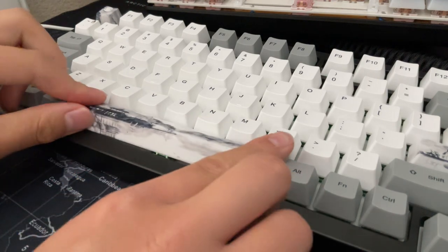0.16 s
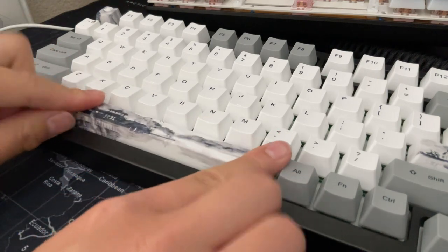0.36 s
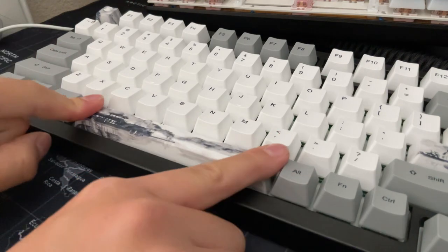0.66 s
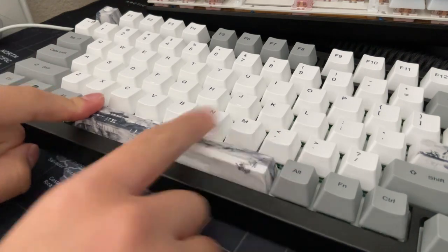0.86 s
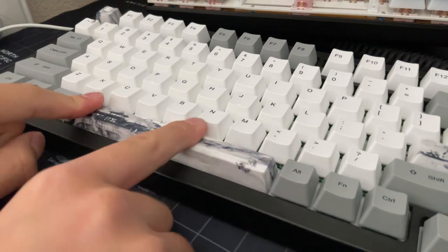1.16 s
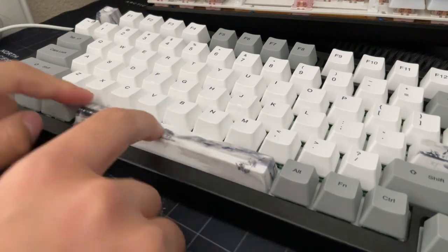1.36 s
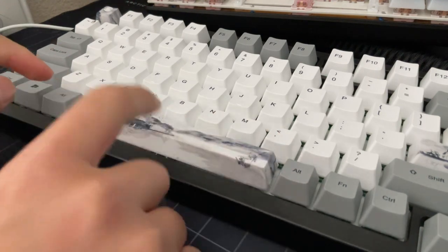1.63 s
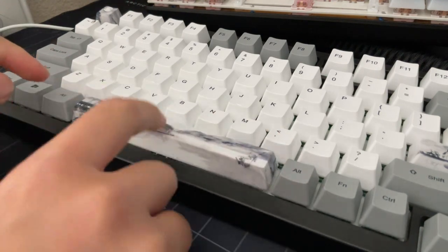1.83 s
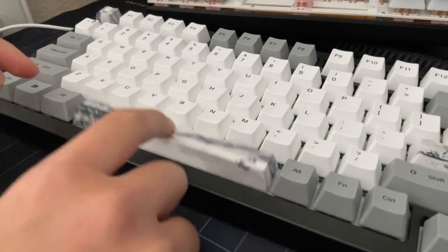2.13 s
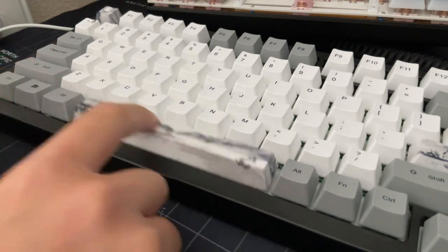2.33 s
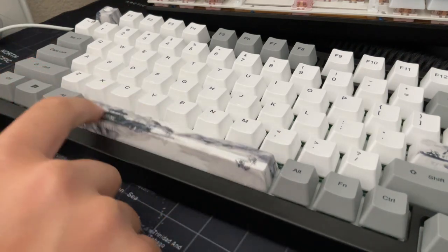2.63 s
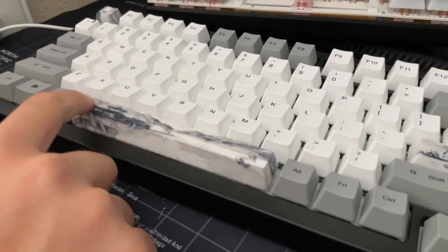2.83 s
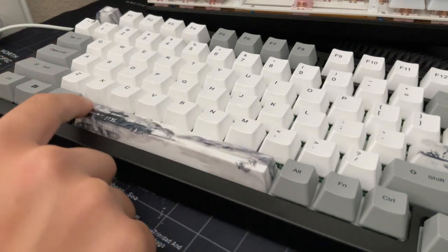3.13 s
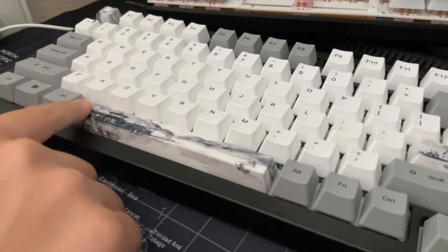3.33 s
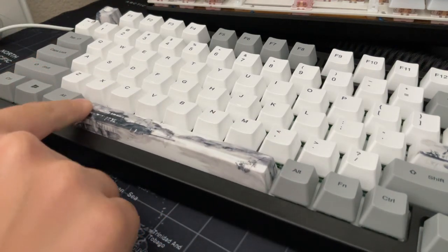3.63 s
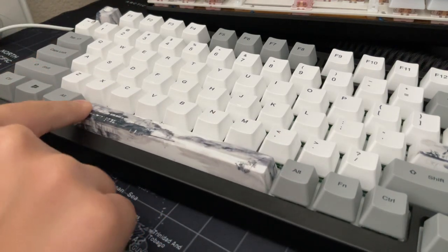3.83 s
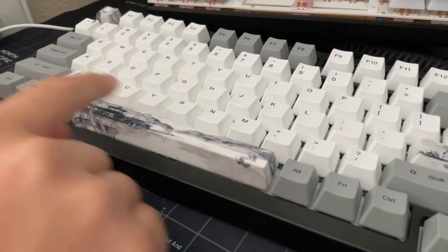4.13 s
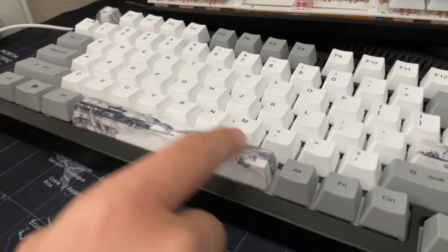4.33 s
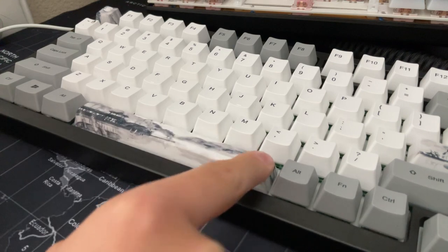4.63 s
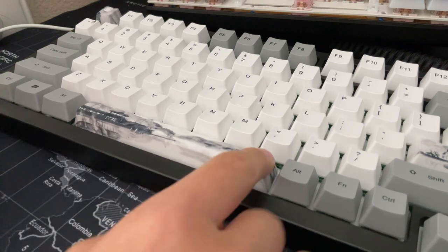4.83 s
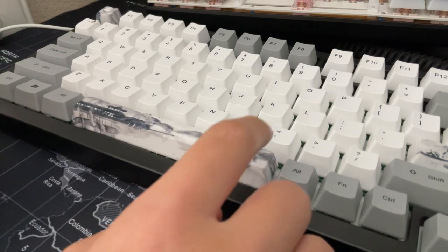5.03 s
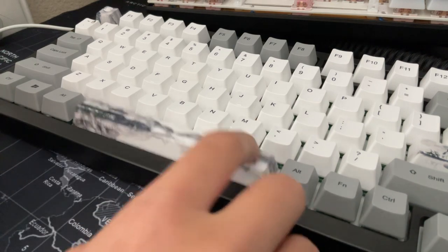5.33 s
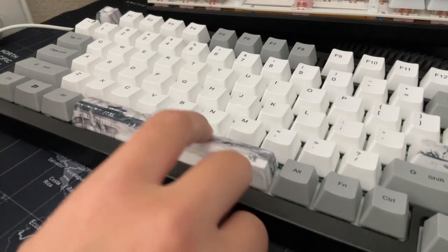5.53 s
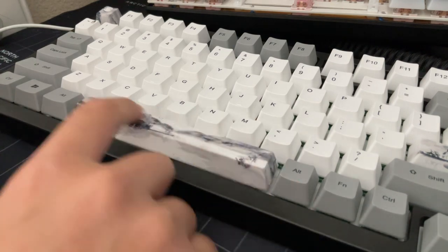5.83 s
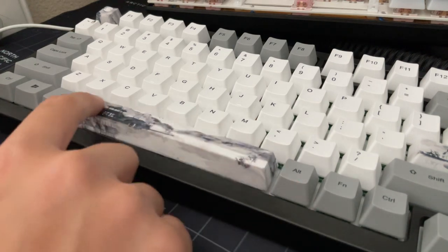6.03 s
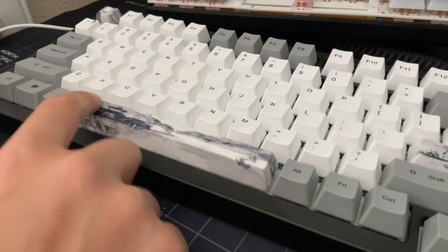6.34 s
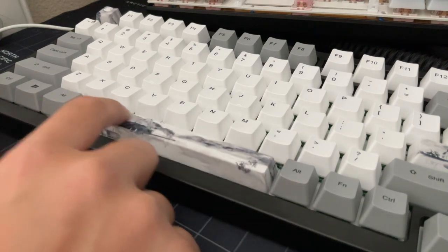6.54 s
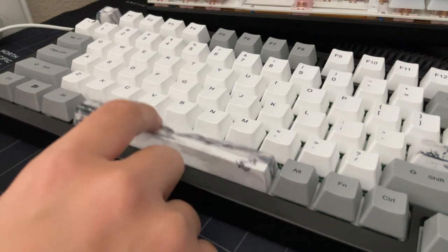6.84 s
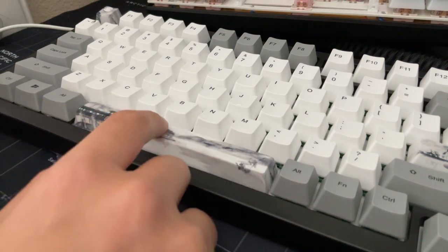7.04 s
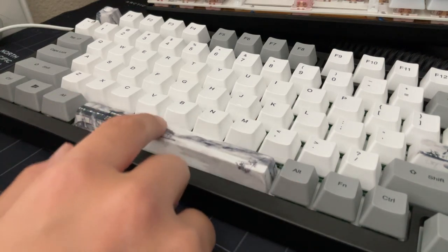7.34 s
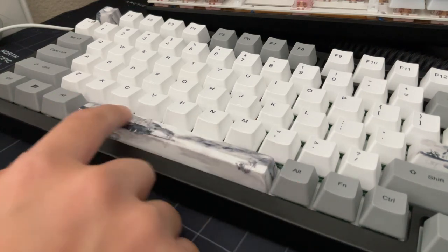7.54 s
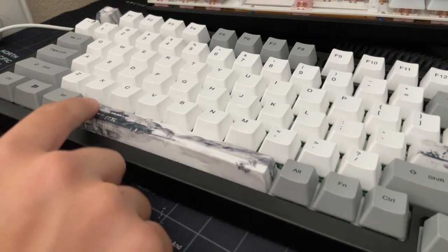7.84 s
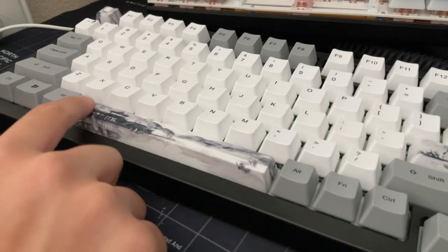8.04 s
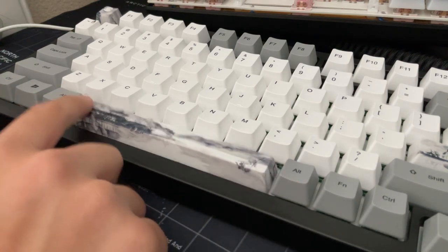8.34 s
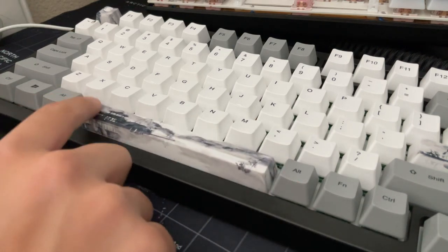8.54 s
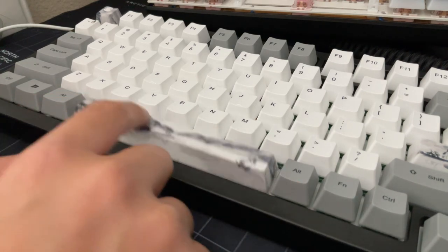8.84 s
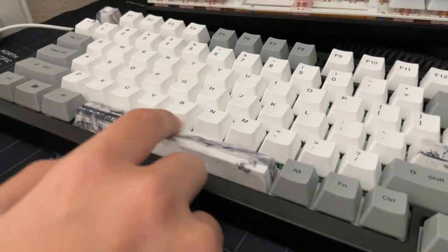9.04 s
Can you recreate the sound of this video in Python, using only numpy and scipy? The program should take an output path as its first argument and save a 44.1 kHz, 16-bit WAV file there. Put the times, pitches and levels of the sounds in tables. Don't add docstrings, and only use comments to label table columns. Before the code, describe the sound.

Mechanical keyboard spacebar heard close on a phone microphone with little bass. Soft skin rubbing, two nail knocks and muffled case bumps lead into a brisk run of sharp, hollow clacks with a low desk thud beneath. The finger rests for about a second, slides faintly, presses a few separate times, then taps continuously at an even pace, strokes varying in force, with small release clicks and loose rattling ticks between.

```python
import sys
import numpy as np
from scipy import signal
from scipy.fft import rfft, irfft
from scipy.io import wavfile
from scipy.ndimage import uniform_filter1d, map_coordinates

SR = 44100
rng = np.random.default_rng(int(sys.argv[2]) if len(sys.argv) > 2 else 0)


def waveform_to_disk(signal):
    frames = np.transpose(np.atleast_2d(signal))
    scaled = np.clip(frames, -1, 1) * 32767
    samples = np.round(scaled).astype(np.int16)
    wavfile.write(sys.argv[1], SR, samples)


def volts_from_decibels(level):
    exponent = np.asarray(level, float) / 20
    return 10 ** exponent


N = 404838
RING = np.arange(round(0.3 * SR)) / SR


def unit(x):
    return x / np.sqrt(np.mean(x ** 2) + 1e-20)


def along(points, hz):
    f, v = np.transpose(points)
    return np.interp(np.log(hz + 1), np.log(f + 1), v)


def decay(t60, rise):
    return volts_from_decibels(-60 * RING / t60) * (1 - np.exp(-RING / rise))


def burst(spectrum, envelope):
    gain = volts_from_decibels(along(spectrum, np.fft.rfftfreq(len(RING), 1 / SR)))
    noise = irfft(rfft(rng.standard_normal(len(RING))) * gain, len(RING))
    out = envelope * noise
    return out / np.abs(out).max()


def hiss(spectrum, patchy_db):
    hz, _, z = signal.stft(rng.standard_normal(N), SR, nperseg=512)
    field = uniform_filter1d(rng.standard_normal(z.shape), size=8, axis=0)
    field = uniform_filter1d(field, size=5, axis=1)
    gain = volts_from_decibels(along(spectrum, hz)[:, None] + patchy_db * unit(field))
    return unit(signal.istft(z * gain, SR, nperseg=512)[1][:N])


def ring(modes, attack, vary_db=2.3):
    hz, db, t60 = np.transpose(modes)[:, :, None]
    detune = 0.009 * rng.standard_normal((len(modes), 1))
    vary = vary_db * rng.standard_normal((len(modes), 1))
    wave = np.sin(2 * np.pi * hz * (1 + detune) * RING)
    rise = (1 - np.exp(-RING / attack * (hz / hz[0]) ** 2)) ** 2
    out = np.sum(volts_from_decibels(db + vary - 60 * RING / t60) * rise * wave, axis=0)
    return out / np.abs(out).max()


# f/Hz, t60/s
SCATTER_T60 = [(150, 0.43), (600, 0.046), (1600, 0.22), (4000, 0.15), (10000, 0.14)]


def answer(x, db):
    hz, t, z = signal.stft(rng.standard_normal(len(RING)), SR, nperseg=128)
    damping = volts_from_decibels(-60 * t / along(SCATTER_T60, hz)[:, None])
    tail = signal.istft(z * damping, SR, nperseg=128)[1][:len(RING)]
    tail = tail * (1 - np.exp(-(RING / 0.008) ** 2))
    instant = x * (0.15 + np.exp(-RING / 0.002))
    instant = instant * np.linalg.norm(x) / np.linalg.norm(instant)
    return x + volts_from_decibels(db) * signal.fftconvolve(instant, tail / np.linalg.norm(tail))[:len(RING)]


def rattle(envelope):
    late = rng.uniform(0.001, 0.005, size=2)
    weaker_db = rng.uniform(-13, -6, size=2)
    out = envelope
    for s, db in zip(late, weaker_db):
        out = out + volts_from_decibels(db) * np.roll(envelope, round(s * SR))
    return out


def swells(rows):
    middle, half, *levels = np.transpose(rows)[:, :, None]
    t = np.arange(N) / SR
    coarse = t[::32]
    shape = volts_from_decibels(-20 * np.abs((coarse - middle) / half) ** 2.6)
    return [np.interp(t, coarse, np.sqrt(volts_from_decibels(2 * db[:, 0]) @ shape)) for db in levels]


def add(track, s, sound):
    track[max(round(s * SR), 0):][:len(sound)] += sound


# f/Hz, density/dB per Hz
ROOM_SPECTRUM = [(18, -35.5), (30, -15), (81, 13), (121, -3), (157, -8.5), (295, 4.5), (415, -2),
                 (684, 5.5), (913, -16.5), (1460, -12.5), (4420, -21), (15500, -28.5), (15900, -58)]


def room():
    return volts_from_decibels(-72) * hiss(ROOM_SPECTRUM, patchy_db=1)


# middle t/s, half length/s, rumble level/dB
PALM_SHIFTS = [(.236, 0.04, -71), (.37, 0.029, -64), (.5, 0.15, -47), (.73, 0.073, -65.5),
               (.835, .035, -53.5), (.97, 0.093, -57.5), (1.22, 0.082, -56), (1.34, 0.018, -57),
               (3.93, 0.092, -72.5), (9.1, 0.089, -57), (4.7, 0.14, -65.5), (4.85, 0.099, -63)]
# f/Hz, density/dB per Hz
MAT_SPECTRUM = [(40, -11), (70, 4), (200, -2.5), (500, -19.5), (1000, -16.5), (1500, -34.5)]


def palms():
    return volts_from_decibels(-8) * swells(PALM_SHIFTS)[0] * hiss(MAT_SPECTRUM, patchy_db=3)


# t/s, peak level/dB, desk level against it/dB
BUMPS = [
    (0.02, -42, -13),
    (0.388, -23, -19.5),
    (0.748, -50, -11.5),
    (0.914, -40, -10),
    (1.174, -53.5, -32),
    (1.36, -49, -1),
    (4.104, -44, -16),
    (4.637, -54, -6),
]
# f/Hz, level/dB, t60/s
HEEL_MODES = [(150, -1, 0.079), (199.7, 5, 0.047), (305, -1.5, 0.026), (400, -12.5, .025)]
# f/Hz, level/dB, t60/s
DESK_MODES = [(69.7, 0.51, 0.19), (123, 2, 0.082), (86.4, -1.3, 0.14)]


def hands():
    track = np.zeros(N + SR)
    damped = [(hz, db, 0.69 * t60) for hz, db, t60 in DESK_MODES]
    for s, db, desk_db in BUMPS:
        thud = ring(HEEL_MODES, attack=0.004) + volts_from_decibels(desk_db + 10.5) * ring(damped, attack=0.012)
        add(track, s - 0.003, volts_from_decibels(db) * thud)
    return track[:N]


# t/s, force level/dB, then against it
# lower cap level/dB, stem level/dB, extra case level/dB
PRESSES = [(1.3565, -6.5, -7, -15.5, 3.5), (1.618, -18, -5, -10, -2.5), (1.7617, -3.5, -13, -19, 1.5),
           (1.923, -6, -8, -15, 0), (2.0963, -7, -8, -15, 1), (2.2668, -17.5, -1, -12, 1.5),
           (2.448, -17.5, -1, -11.5, 2.5), (2.6205, -48.5, 14, -9, -2), (2.7467, -19.5, 0, -13, 1),
           (2.934, -21.5, -1.5, -17.5, -1.5), (3.096, -13.5, -3.5, -14.5, 0.5),
           (4.1021, -14.5, -4.5, -2, 4.5), (4.4838, -15.5, -4, -10, -1.5), (4.97, -50, 12, -2.5, -3.5)]
RUN = [(5.1354, -7.5, -6.5, -16, 0.0063), (5.3049, -15.5, -3.5, -12, 0), (5.4619, -11, -5, -12, 0),
       (5.645, -18.5, -2.5, -12.5, 0), (5.7963, -22.5, -3.5, -10.5, 0), (5.956, -19, -1.5, -10.5, 0),
       (6.1083, -33, 7, -10, 0), (6.2415, -25, 3.5, -10, 0), (6.3927, -19.5, -1.5, -17, 0.0047),
       (6.5666, -45.5, 12.5, -6.5, 0), (6.7171, -13.5, -6, -15, 0), (6.8833, -28.5, 2.5, -12, 0),
       (7.027, -11, -5, -14.5, 0), (7.201, -17.5, -3, -18, 0), (7.365, -16.5, -3, -15.5, 0),
       (7.524, -26.5, 2.5, -11, 0.0043), (7.7842, -36.5, 5.5, -5, 0.0094), (7.8612, -14, -3.5, -19.5, 0),
       (8.0345, -13, -4.5, -16, 0), (8.2081, -12, -5, -19, 0), (8.3699, -19, 0, -17, 0.0079),
       (8.543, -34, 6, -9.5, 0), (8.7254, -17.5, -3.5, -18, 0.013), (8.8845, -18, -1.5, -12.5, 0)]
# t/s, force level/dB, then against it lower cap level/dB, stem level/dB
RELEASES = [(1.8339, -29.5, 4.5, -2.5), (2.0086, -27.5, 2, -4.5), (2.174, -31, 6, -1.5),
            (2.37, -31.5, 4.5, -3), (2.6851, -42, 11, -3), (2.863, -37.5, 9, -1), (3.0107, -73, 25, 12),
            (4.2688, -30, 2.5, -4.5), (5.228, -40, 11, 4), (5.3776, -28.5, 4, -2.5), (5.5507, -33, 3, -3),
            (5.7115, -29.5, 2.7, -2.5), (5.8635, -34, 6.5, 1), (6.0361, -44.5, 11.5, 1.5),
            (6.6233, -27.5, -2.5, -6.5), (6.7953, -35.5, 5, -0.5), (6.9466, -31, 9.5, -1.5),
            (7.1299, -48.5, 10.5, 0), (7.2813, -37, 6.5, 0.5), (7.4528, -52, 14.5, 4.5),
            (7.6309, -40, 8, -2), (7.949, -36, 8, 0), (8.1165, -36.5, 8, -1.5), (8.2846, -37, 8.5, -1),
            (8.4446, -32, 5, -3.5), (8.622, -46.5, 14.5, 4), (8.7977, -29, 1, -5.5),
            (8.9739, -37.5, 4, -1.5), (9.1348, -35, 5, -3)]


def roll(db, grows, t60):
    power = np.zeros(N)
    for s, force_db, *_ in PRESSES + RUN + RELEASES:
        power[round(s * SR)] = volts_from_decibels(2 * (db + grows * force_db))
    return np.sqrt(signal.lfilter([1], [1, -volts_from_decibels(-120 / SR / t60)], power))


# middle t/s, half length/s,
# hiss level/dB, level of the drag through the cap/dB
SLIDES = [(0.03, 0.065, -58.5, -64.5), (0.12, 0.039, -63, -68.5), (0.232, 0.043, -58.5, -59),
          (.241, 0.008, -57, -51.5), (.33, 0.049, -82, -79), (0.38, 0.12, -62.5, -65.5),
          (0.58, .11, -59, -65.5), (0.75, 0.036, -59.5, -67.5), (0.83, 0.036, -57.5, -69),
          (0.91, 0.069, -61, -70.5), (1.04, 0.03, -68.5, -84), (1.23, 0.079, -59.5, -71),
          (1.34, 0.015, -70, -66), (3.375, 0.054, -60, -72), (3.87, 0.038, -79.5, -81),
          (4.055, 0.013, -68, -75), (4.094, 0.016, -53.5, -60.5), (4.24, 0.067, -53, -62),
          (4.36, 0.097, -57, -67.5), (4.57, 0.095, -64.5, -73.5), (3.937, 0.012, -71, -94.5),
          (4.9, 0.072, -69.5, -77.5), (5.0, .04, -100, -87), (5.12, 0.0053, -62, -55),
          (6.49, 0.087, -72, -90)]
# middle t/s, half length/s, hiss level/dB, dry hiss level/dB
RUBS = [(1.42, 0.071, -68, -96), (1.67, 0.092, -72, -86), (1.96, 0.091, -60.5, -76), (2.2, 0.3, -69, -84),
        (2.49, 0.062, -64, -77), (2.8, 0.21, -70.5, -90), (3.14, 0.054, -65, -90), (5.2, 0.075, -64.5, -84),
        (5.34, 0.092, -65, -79), (5.5, 0.1, -65, -78), (5.72, 0.14, -66, -80), (5.9, .1, -63.5, -67),
        (6.07, 0.13, -67, -76), (6.28, 0.06, -68, -87), (6.6, 0.14, -70.5, -84), (6.83, 0.2, -72, -87),
        (7.07, 0.074, -64, -81), (7.26, 0.054, -68, -84), (7.41, 0.055, -69, -81), (7.56, 0.11, -70, -72),
        (7.69, 0.085, -74.5, -89.5), (7.91, 0.11, -68, -78), (8.08, 0.057, -70, -72),
        (8.25, 0.053, -66, -84), (8.47, 0.098, -72, -77), (8.6, 0.046, -76, -80), (8.76, 0.12, -68, -77),
        (8.92, 0.094, -76, -72), (9.02, 0.063, -75.5, -87), (9.15, 0.029, -70, -71)]
# middle t/s, half length/s, level/dB
FLICKS = [(0.32, 0.1, -70), (0.59, 0.091, -60.5), (0.755, 0.034, -64), (0.83, .03, -67),
          (0.891, 0.0018, -50.5), (1.2, 0.023, -64), (0.77, .003, -58), (3.38, 0.06, -67),
          (3.937, 0.011, -77.5), (4.25, 0.1, -59), (4.6, 0.054, -70.5), (6.49, 0.063, -71)]
# f/Hz, density/dB per Hz
SKIN_SPECTRUM = [(1350, -12.5), (2300, -7), (4300, 4), (4770, 5), (7640, -1.5), (11500, -10),
                 (15600, -15.5), (15900, -53.5)]
# f/Hz, density/dB per Hz
DRAG_SPECTRUM = [(700, -9.5), (1200, -4.5), (1550, 2.5), (1950, -2.5), (2300, -8), (2800, -5.5),
                 (4000, -35)]
# f/Hz, density/dB per Hz
DRY_SKIN_SPECTRUM = [(3000, -30.5), (5500, -9.5), (7800, -1), (10500, -7.5), (14000, -7.5), (15600, -10),
                     (15900, -49)]


def fingertip():
    skin_gain, drag_gain = swells(SLIDES)
    rub_gain, dry_rub_gain = swells(RUBS)
    flick_gain = swells(FLICKS)[0]
    skin_gain = np.hypot(np.hypot(skin_gain, rub_gain), roll(-68, grows=0.2, t60=0.4))
    drag_gain = np.hypot(drag_gain, roll(-51, grows=0.3, t60=0.5))
    dry_gain = np.hypot(np.hypot(flick_gain, dry_rub_gain), roll(-78.5, grows=0.2, t60=0.4))
    texture = rng.standard_normal(SR // 10)
    grain = volts_from_decibels(2 * map_coordinates(texture, [np.arange(N) * 220 / SR]))
    skin = volts_from_decibels(-1.5) * skin_gain * hiss(SKIN_SPECTRUM, patchy_db=1.2)
    drag = volts_from_decibels(0.5) * drag_gain * hiss(DRAG_SPECTRUM, patchy_db=1.2)
    dry_skin = dry_gain * hiss(DRY_SKIN_SPECTRUM, patchy_db=6)
    return grain * (dry_skin + skin + drag)


# t/s, peak level/dB
SPECKS = [(.308, -62), (1.4, -51), (1.9114, -61), (2.615, -51), (2.6603, -57), (5.128, -52), (5.206, -49),
          (5.2728, -62), (6.0825, -60), (6.6053, -62), (7.105, -60), (7.18, -64), (7.26, -58),
          (7.6738, -66.5), (7.7587, -58), (8.581, -55), (8.845, -63)]


def specks():
    track = np.zeros(N + SR)
    for s, db in SPECKS:
        add(track, s, volts_from_decibels(db) * burst(DRY_SKIN_SPECTRUM, rattle(decay(0.0061, rise=0.00049))))
    return track[:N]


# t/s, peak level/dB, t60/s
KNOCKS = [
    (0.0161, -27, 0.019),
    (0.3782, -26, 0.033),
    (4.1162, -25, 0.051),
]
# f/Hz, density/dB per Hz
KNOCK_SPECTRUM = [(600, -17.5), (1300, 7.5), (2000, -1.5), (3200, -5), (5300, -6), (9000, -13),
                  (15500, -26.5), (16300, -48)]


def fingernail():
    track = np.zeros(N + SR)
    for s, db, t60 in KNOCKS:
        add(track, s, volts_from_decibels(db) * answer(burst(KNOCK_SPECTRUM, decay(t60, rise=0.00082)), -16))
    return track[:N]


# t/s, peak level/dB
TICKS = [(0.8882, -51), (2.1524, -38), (2.2652, -46), (2.3482, -48), (2.4452, -36.5), (2.7439, -33),
         (2.845, -58), (4.21, -41), (5.5345, -42.5), (5.844, -45), (6.156, -44.5), (6.6847, -50),
         (6.7781, -40), (7.008, -43.5), (7.423, -47), (7.9293, -39), (8.426, -41.5), (8.779, -45),
         (8.95, -46), (9.1177, -51)]
# t/s, peak level/dB
TOUCHES = [(1.1784, -49.5), (2.607, -43), (4.633, -51), (5.435, -47), (5.9217, -44), (7.175, -46),
           (7.334, -48), (7.8288, -41.5), (8.0098, -41), (8.1835, -44.5), (8.334, -48), (8.505, -43.5),
           (8.688, -53), (8.8498, -51)]
# f/Hz, density/dB per Hz
WIRE_SPECTRUM = [(700, -42), (1300, 4), (2500, 1.5), (4500, -6), (7000, -22.5), (12000, -15), (16300, -48)]
# f/Hz, density/dB per Hz
TOUCH_SPECTRUM = [(500, -48), (1000, -8.5), (1500, 2), (2600, -9), (4500, -10), (7000, -33.5),
                  (16000, -37.5)]
# f/Hz, level/dB, t60/s
STEM_MODES = [(3406, -10, .018), (4250, -8, .018), (4563, -1, .022), (5650, -7, .016), (3000, -14, .014),
              (9700, -13, .01), (12800, -24, .02)]


def wire():
    track = np.zeros(N + SR)
    envelope = decay(0.0061, rise=0.00049)
    for s, db in TICKS:
        tick = burst(WIRE_SPECTRUM, rattle(envelope))
        tick = tick + volts_from_decibels(-10) * ring(STEM_MODES, attack=0.00069, vary_db=4)
        add(track, s, volts_from_decibels(db + 5.5) * answer(tick, -18.5))
    for s, db in TOUCHES:
        touch = burst(TOUCH_SPECTRUM, rattle(envelope ** 0.6))
        add(track, s, volts_from_decibels(db + 3.5) * answer(touch, -8.5))
    return track[:N]


# f/Hz, level/dB, t60/s
UPPER_MODES = [(2005, 4, 0.014), (2124, -1.5, 0.0081), (2400, -21, 0.032), (2468, -6.5, 0.021),
               (2670, -10.5, 0.023), (1900, -25, 0.06)]
# f/Hz, level/dB, t60/s
LOWER_PRESS_MODES = [(1445, 10.5, 0.024), (1329, -14, 0.025), (1615, -11, 0.085), (880, -13, 0.03),
                     (1540, -12, .03)]
# f/Hz, level/dB, t60/s
LOWER_RELEASE_MODES = [(1570, -0.5, 0.027), (1490, 14.5, 0.0047), (1275, 3, 0.011), (1060, -11, 0.023),
                       (930, -17, .06), (1555, -3.5, .05)]
# f/Hz, level/dB, t60/s
STEM_PRESS_MODES = [(3406, -6, .016), (4290, -5, .016), (4563, -1.5, .018), (5650, -1, .012),
                    (3110, -6, .014), (7450, -9, .009), (4800, -8, .012), (6000, -6, .008)]
# f/Hz, level/dB, t60/s
CASE_MODES = [(346.3, 0, 0.065), (190.4, -2.5, 0.093), (400.3, 6, 0.033), (475.4, 2, 0.022),
              (620, -19, 0.095), (685, -18.5, 0.047), (254, -12, .05)]
# f/Hz, density/dB per Hz
CRACK_SPECTRUM = [(2200, -24), (3200, 8), (3800, -20.5), (5500, -0.5), (7500, -8), (8700, -12.5),
                  (9800, -11), (12000, -20.5), (15500, -16), (16300, -58)]
# f/Hz, density/dB per Hz
SNAP_SPECTRUM = [(2500, -42), (3400, -13.5), (4600, 1), (6000, 0), (7500, -10), (9500, -4.5), (13000, -15),
                 (16300, -27)]
# f/Hz, density/dB per Hz
SLAM_SPECTRUM = [(60, -21), (150, 3.5), (500, -5), (900, -6), (1500, -30.5), (3000, -50)]
# f/Hz, density/dB per Hz
CLATTER_SPECTRUM = [(900, -27.5), (1300, -5), (1600, 10), (1900, -0.5), (2300, -12.5), (2800, -15),
                    (3500, -24), (6000, -40.5)]
# f/Hz, density/dB per Hz
GUIDE_SPECTRUM = [(800, -28), (1200, -6.5), (1500, -18), (2000, -20.5), (5000, -25), (12000, -45)]


def strokes(rows, lower_modes, stem_modes, crack_db, crack_t60, travel_db, wet_db, far_db):
    track = np.zeros(N + SR)
    for s, db, lower_db, stem_db, *weight_db in rows:
        crack_spectrum = SNAP_SPECTRUM if stem_db - lower_db > -5.5 else CRACK_SPECTRUM
        crack = burst(crack_spectrum, decay(crack_t60, rise=0.0002))
        modes = STEM_MODES if stem_db > -9.8 else stem_modes
        stem = ring(modes, attack=0.000081, vary_db=4.5) + volts_from_decibels(crack_db) * crack
        stem = volts_from_decibels(stem_db + 8) * stem
        cap = ring(UPPER_MODES, attack=0.00048, vary_db=1.5)
        cap = cap + volts_from_decibels(lower_db) * ring(lower_modes, attack=0.00058, vary_db=1.5)
        far_lag = round(SR * rng.normal(0.0108, 0.0006))
        key = -cap - stem - volts_from_decibels(far_db) * np.roll(cap + 0.45 * stem, far_lag)
        clatter = burst(CLATTER_SPECTRUM, decay(0.19, rise=0.0034))
        key = key + volts_from_decibels(-20.5 + 0.33 * lower_db) * clatter

        case_db = -23 + sum(weight_db) + (0.42 - 1) * db
        desk_db = -41.5 + (0.23 - 1) * db
        body = volts_from_decibels(case_db) * ring(CASE_MODES, attack=0.003, vary_db=2.2)
        body = body + volts_from_decibels(desk_db) * ring(DESK_MODES, attack=0.005)
        body = body + volts_from_decibels(-12.5 + db) * burst(SLAM_SPECTRUM, decay(0.018, rise=0.0004))
        body = np.roll(body, round(0.0012 * SR))
        add(track, s + 0.0007, volts_from_decibels(db) * (answer(key, wet_db) + answer(body, -10.5)))

        travel = burst(GUIDE_SPECTRUM, volts_from_decibels(-60 * RING / 0.03))[round(0.02 * SR)::-1]
        add(track, s - 0.0192, volts_from_decibels(0.5 * db + travel_db) * travel)
    return track[:N]


def scene():
    background = room() + palms() + hands()
    finger = fingertip() + specks() + fingernail()
    presses = strokes(PRESSES + RUN, LOWER_PRESS_MODES, STEM_PRESS_MODES, crack_db=-3, crack_t60=0.016,
                      travel_db=-32, wet_db=-21.5, far_db=-19)
    releases = strokes(RELEASES, LOWER_RELEASE_MODES, STEM_MODES, crack_db=-3.5, crack_t60=0.012,
                       travel_db=-28, wet_db=-22.5, far_db=-19.5)
    return (background + finger + wire() + presses + releases)[None]


def top_cut(x):
    return signal.sosfilt(signal.butter(12, 16820, fs=SR, output="sos"), x)


def record(dry):
    cut = signal.butter(6, 50, "high", fs=SR, output="sos")
    return top_cut(signal.sosfilt(cut, dry))


dry = scene()
out = record(dry)
waveform_to_disk(out)
```